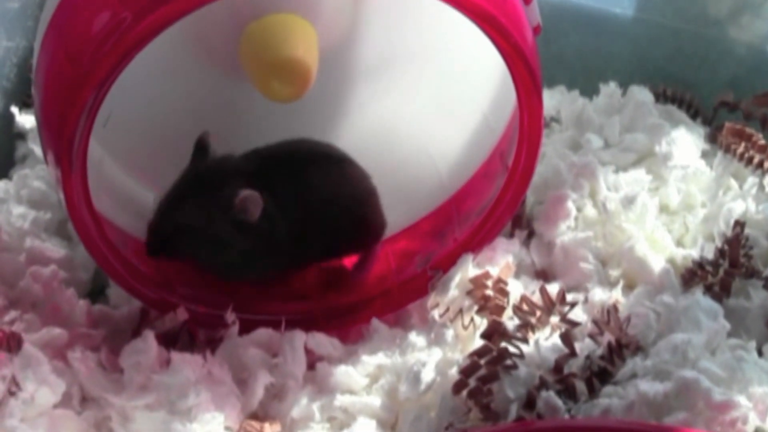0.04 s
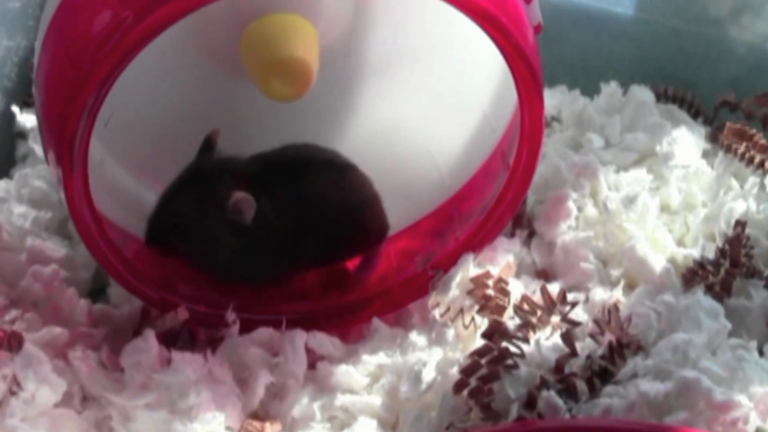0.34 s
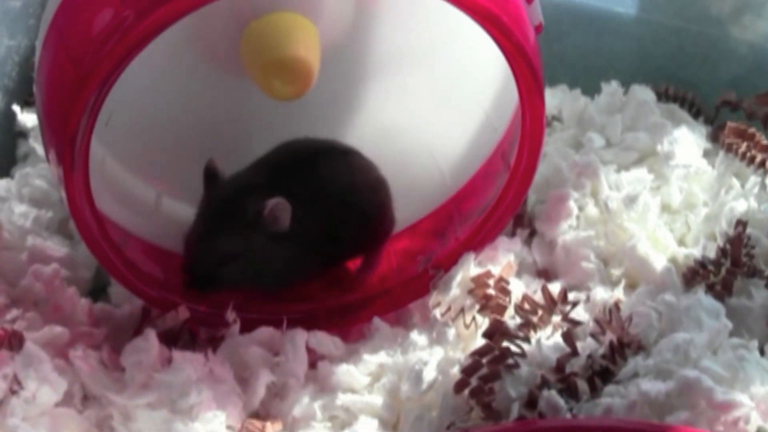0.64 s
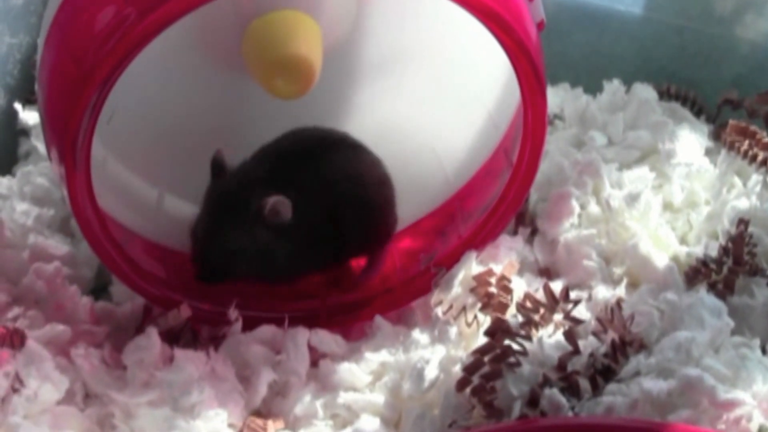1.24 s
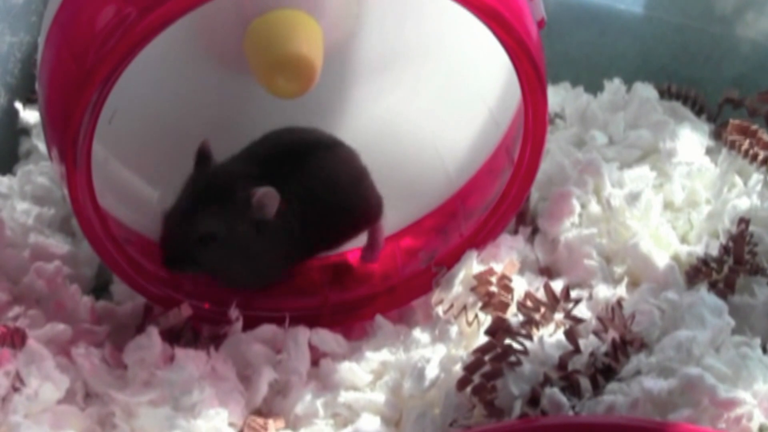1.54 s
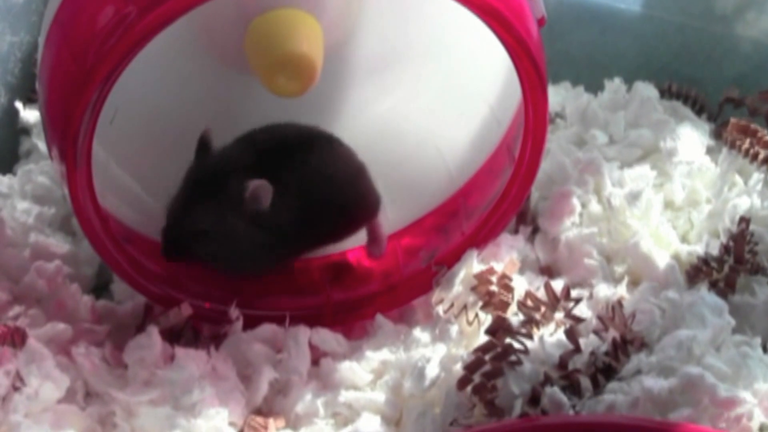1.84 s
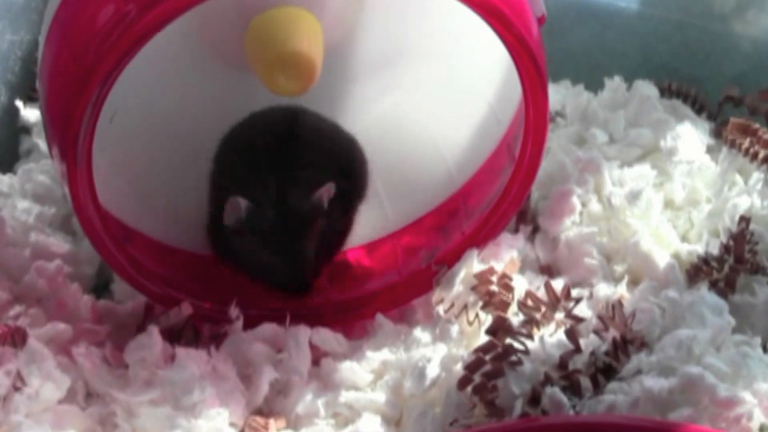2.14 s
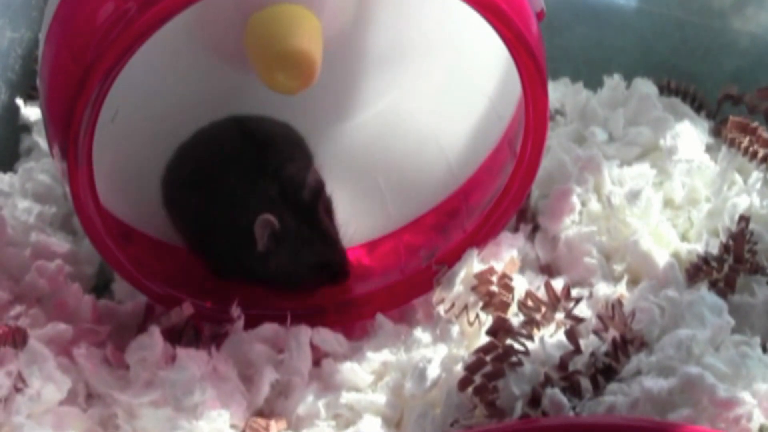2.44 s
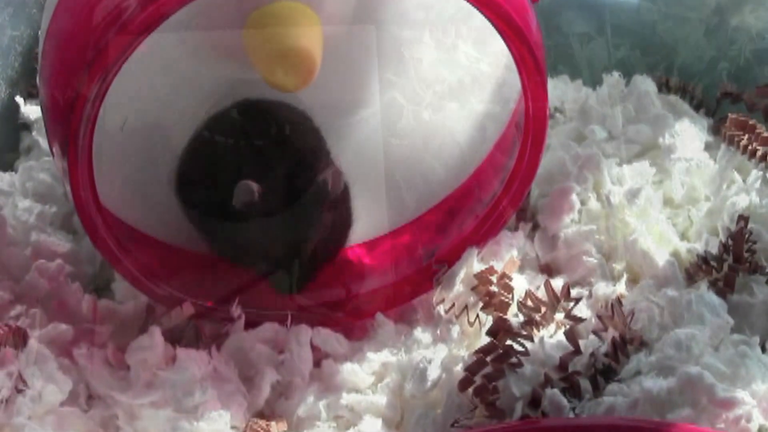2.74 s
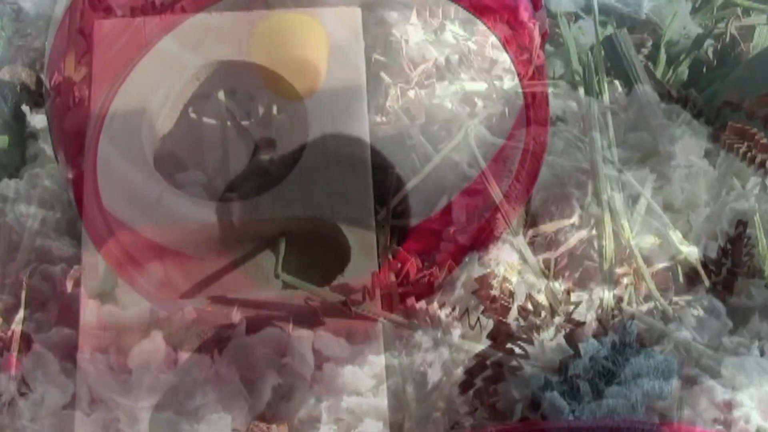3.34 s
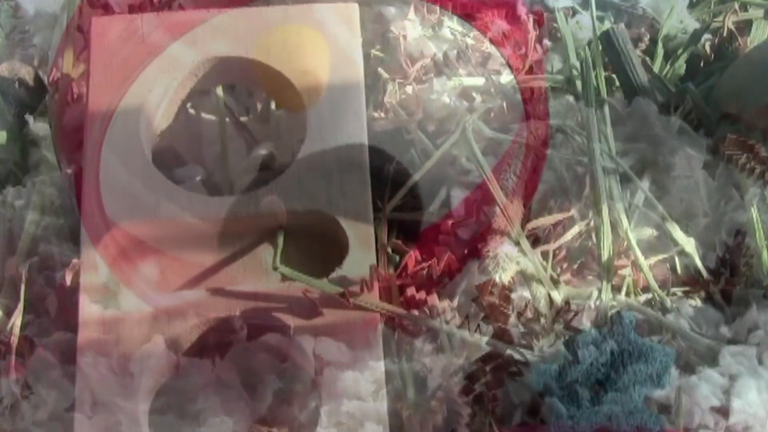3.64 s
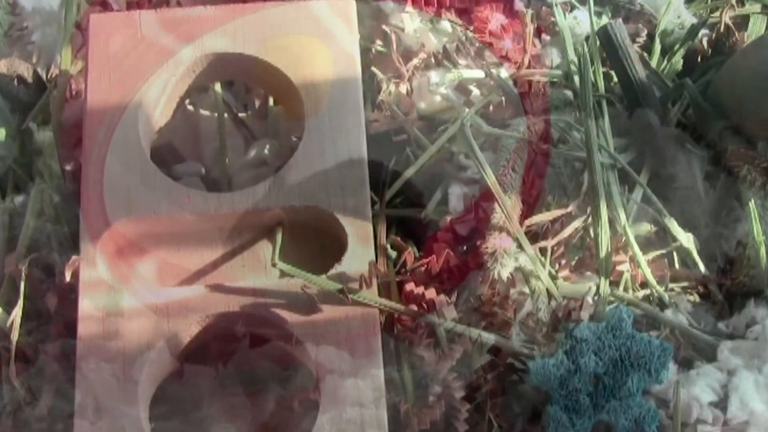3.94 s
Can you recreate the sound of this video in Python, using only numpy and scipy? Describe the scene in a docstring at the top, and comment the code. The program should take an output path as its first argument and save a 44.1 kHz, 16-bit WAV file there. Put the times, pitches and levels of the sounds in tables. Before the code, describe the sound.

Close, rapid scratching of hamster claws on a plastic wheel comes in uneven runs, with a faint rumble as the wheel rocks. After a lull, a few dry hay stalks snap softly. The quiet room hums and hisses throughout.

```python
"""A quiet room, close to a hamster scrabbling in its plastic wheel. Quick pairs of claw strokes rasp
over the plastic and set it ringing; a few catch and chirp. The wheel rumbles faintly as it rocks, and
an appliance hums. Around a brief dropout the room starts fading into a second, hissier one, where dry
hay crackles and a few stalks snap."""
import sys
import numpy as np
from scipy import signal
from scipy.fft import rfft, irfft
from scipy.io import wavfile
from scipy.ndimage import uniform_filter1d

SR = 44100
rng = np.random.default_rng(int(sys.argv[2]) if len(sys.argv) > 2 else 0)


def generate_wav(signal):
    """Clip the signal to [-1, 1] and save it as 16-bit WAV at the path in sys.argv[1]."""
    frames = np.transpose(np.atleast_2d(signal))
    scaled = np.clip(frames, -1, 1) * 32767
    pcm = np.round(scaled).astype(np.int16)
    wavfile.write(sys.argv[1], SR, pcm)


N = 176400
TIME = np.arange(N) / SR

# Claw strokes. Each row: start in seconds, relative level, bass and treble trims in dB, rise in seconds.
CLAW_STROKES = [(0.001, -52, 4.5, 0.5, 0.0022), (0.041, -52.5, -5, 1.5, 0.0026),
                (0.074, -47.5, -2, -3.5, 0.0068), (0.127, -55.5, -6, -7, 0.0047),
                (0.158, -45, -1, -3.5, 0.0036), (0.197, -47.5, 1.5, 2, 0.0028),
                (0.23, -43.5, 0.5, -2, 0.0031), (0.274, -45.5, -1, -0.5, 0.0031),
                (0.303, -44, -2.5, -1.5, 0.0027), (0.354, -49, 3, 1, 0.0032),
                (0.379, -49.5, 3.5, -2, 0.0037), (0.431, -44.5, 0.5, 3, 0.0023),
                (0.459, -47.5, 2, -2.5, 0.0026), (0.509, -44.5, 1, 0, 0.0023),
                (0.537, -50, 4.5, -2.5, 0.0033), (0.584, -38.5, -3.5, -2, 0.0025),
                (0.609, -46, -0.5, 0.5, 0.0028), (0.673, -49.5, -1, -0.5, 0.0059),
                (0.745, -46, -10, -5.5, 0.0048), (0.783, -49.5, -9, -1, 0.0043),
                (0.821, -54.5, 3, 3.5, 0.0047), (0.86, -58.5, -4, 3, 0.0039), (0.896, -57, 4, 1.5, 0.0065),
                (1.016, -52, -16, -1, 0.0039), (1.043, -63, 13.5, 10, 0.0057), (1.091, -44, 0.5, 1, 0.0028),
                (1.122, -41.5, 0, 0.5, 0.0033), (1.168, -44.5, 2, 0.5, 0.0028),
                (1.197, -43.5, 1, -1, 0.0032), (1.244, -40, -7, 0.5, 0.0025),
                (1.276, -45.5, -1, 1.5, 0.0038), (1.321, -55, -2.5, 0.5, 0.004),
                (1.349, -55, 2, 2.5, 0.004), (1.432, -47.5, -5, 4, 0.0034), (1.486, -51, -13, -3.5, 0.0047),
                (1.519, -56, -1, 4, 0.0053), (1.567, -60, -0.5, 4, 0.0051), (1.604, -52, -4, 0.5, 0.004),
                (1.643, -64, -3, 7.5, 0.0052), (1.681, -45.5, -4.5, -3, 0.0045), (1.727, -66, 1, 5, 0.008),
                (1.762, -51, 0, 0, 0.0043), (1.806, -50.5, -1.5, 5, 0.0039), (1.841, -51, 4, 4.5, 0.004),
                (1.892, -45.5, -2.5, 3, 0.0024), (1.923, -51, 4.5, -0.5, 0.0048),
                (1.974, -40.5, -8, -7.5, 0.0031), (2.003, -48, 0, 4, 0.0042),
                (2.051, -42.5, -4.5, -2, 0.0029), (2.08, -45.5, -1, 3.5, 0.0035),
                (2.122, -45, -4, -1, .002), (2.132, -54, -8, 7.5, 0.0027), (2.151, -44.5, -4.5, -5, 0.0017),
                (2.162, -52.5, -12, 6.5, 0.0022), (2.201, -56, -6, 2, 0.0054),
                (2.239, -44.5, 1.5, 1, 0.0024), (2.289, -49.5, -18, 3.5, 0.0022),
                (2.394, -74.5, 20.5, 3, 0.0029), (2.485, -64.5, 5.5, 1, 0.0051),
                (2.848, -60.5, 10.5, 8, 0.0018)]
# Paws shuffling between strokes. Each row: time in seconds, drive level in dB.
PAW_SHUFFLE = [(0, -55), (.98, -58), (1.45, -62), (2.15, -57.5), (2.33, -83), (4, -100)]
# The ring of the plastic. Each row: pitch in Hz, bandwidth in Hz, gain in dB.
WHEEL_MODES = [(1111.3, 16.1, 3), (1508, 10.5, -2), (1751, 30.4, 3.5), (1850, 12.6, 1), (2066, 35.6, 6.5),
               (2158, 15, 3), (2330, 19, -1), (2430, 21, -3.5), (2540, 12, -8), (2670, 17, -6),
               (2750, 22, -2), (3154, 14.5, 1.5), (3667, 14, -0.5), (3715, 35, -5), (3950, 68, -3),
               (4176, 41, -9.5), (4250, 54, -7), (4470, 67, -4), (4584, 55, -2.5), (4740, 50, -7.5),
               (4978, 83.5, 5.5), (5437, 48, -5), (6270, 76, -8), (6473, 55, -8.5), (6770, 72, -10.5),
               (7396, 190, -7.5), (7710, 190, -11), (8260, 110, -6), (8770, 280, -6), (9410, 98, -2.5),
               (10550, 72, -14)]
# EQ of the rasp straight off the claws. Each row: frequency in Hz, relative gain in dB.
RASP_EQ = [(300, -13), (900, 6), (1300, -56), (2000, -1), (4300, -4.5), (6000, -12.5), (9000, -10),
           (12000, -4), (15000, -32)]
# The rocking wheel. Each row: time in seconds, pitch in Hz, level in dB.
WHEEL_RUMBLE = [(0, 94.6, -75.5), (.28, 94.1, -57.5), (.6, 88.9, -59.5), (1.0, 86, -66.5),
                (2.4, 84.4, -69.5), (4, 84, -100)]
# EQ of each room tone. Each row: frequency in Hz, relative gain in dB.
FIRST_ROOM_EQ = [(25, -13), (110, -3), (200, -6.5), (330, -8), (500, -11.5), (1000, -15.5), (2000, -22.5),
                 (4000, -27), (14500, -43)]
SECOND_ROOM_EQ = [(25, -6), (120, -5.5), (220, -13), (500, -11.5), (1000, -20.5), (2000, -21),
                  (4500, -30.5), (9500, -36.5), (14500, -44)]
# Stereo image of the room tone. Each row: frequency in Hz, left-right correlation (1 is mono).
ROOM_CORRELATION = [(30, -0.069), (70, 0.95), (150, 0.83), (350, -0.033), (700, -0.26), (2400, 0.17),
                    (14000, 0.0099)]
# Catching claws. Each row: start in seconds, pitch in Hz, drive level in dB, log-pitch fall per second.
CLAW_CHIRPS = [(.041, 6630, -28, 16), (.078, 2380, -28.5, 2.93), (.357, 4800, -40, 33),
               (.616, 6610, -29, 18), (.784, 4304, -33, 35), (0.858, 5500, -45, 45), (.894, 6570, -31, 22),
               (1.015, 6450, -31, 22), (1.69, 4616, -39.5, 30), (2.208, 6720, -37, 65)]
# EQ of dry hay. Each row: frequency in Hz, relative gain in dB.
HAY_EQ = [(1000, -10), (3000, -2.5), (4000, 2.5), (6500, -1), (8700, 2), (11000, -7.5), (15000, -26)]
# The bed of rustling hay. Each row: time in seconds, level in dB.
HAY_RUSTLE = [(3.3, -88), (3.42, -72.5), (3.51, -80.5), (3.83, -76.5), (3.92, -69), (3.95, -78)]
# Snapping stalks. Each row: start in seconds, creak level in dB, creak pitch in Hz, crack level in dB.
HAY_SNAPS = [(3.389, -65, 2840, -74), (3.591, -45, 4650, -54.5), (3.665, -57, 8100, -54),
             (3.774, -52.5, 4350, -55.5), (3.873, -64, 5730, -80)]
# Small ticks in the hay. Each row: start in seconds, level in dB.
HAY_TICKS = [(3.334, -62), (3.549, -63), (3.954, -62.5)]


def from_db(db):
    """Decibels to gain."""
    return 10 ** (np.asarray(db) / 20)


def rms_one(x):
    """Scale to rms 1."""
    return x / np.sqrt(np.mean(x ** 2) + 1e-20)


def automation(rows):
    """A table's columns as curves over time."""
    times, *columns = np.transpose(rows)
    return [np.interp(TIME, times, column) for column in columns]


def per_bin(points):
    """A table over frequency, read at every FFT bin."""
    hz, value = np.transpose(points)
    return np.interp(np.log(np.arange(N // 2 + 1) * SR / N + 1), np.log(hz), value)


def equalise(x, eq):
    """Colour a sound with an EQ curve."""
    return irfft(rfft(x) * from_db(per_bin(eq)), N)


def butter(x, hz, kind, order=2):
    """Butterworth filter."""
    return signal.sosfilt(signal.butter(order, hz, kind, fs=SR, output="sos"), x + 1e-18)


def resonance(x, hz, width_hz):
    """Two-pole resonator with unity gain at its peak."""
    radius = np.exp(-np.pi * width_hz / SR)
    poles = [1, -2 * radius * np.cos(2 * np.pi * hz / SR), radius ** 2]
    return signal.lfilter(np.array([1, 0, -1]) * (1 - radius ** 2) / 2, poles, x + 1e-18)


def drift(hz):
    """Smooth random modulation, mostly slower than hz; rms 1."""
    rolloff = 1 + (np.arange(N // 2 + 1) * SR / N / hz) ** 2
    return rms_one(irfft(rfft(rng.standard_normal(N)) / rolloff, N))


def grains(per_s, spread_db):
    """Random clicks of uneven size; rms 1."""
    sizes = from_db(spread_db * np.minimum(rng.exponential(1, N), 3)) * rng.choice([-1, 1], N)
    return rms_one(sizes * (rng.random(N) < per_s / SR))


def push(start, rise_s):
    """Contact envelope: begins early, swells to 1 just after start + rise_s and lets go."""
    lead_s, lag_s = 0.88 * rise_s, 0.0017
    force, first = np.zeros(N), max(int((start - lead_s) * SR), 0)
    age = np.arange(min(SR // 10, N - first)) / SR / max(rise_s + lead_s + lag_s, 1e-4)
    force[first:first + len(age)] = (age * np.exp(1 - age)) ** 2.61
    return force


def claws():
    """Each stroke is a short run of tiny slips, duller or brighter with the angle of the claw."""
    treble_lead_s, bass_lag_s = 0.00053, 0.00082  # the claw slows as it digs in: treble first, bass last
    bass_hz, treble_hz, drag_s = 3060, 6480, 0.024
    force = np.zeros((3, N))  # bass, mid, treble
    for start, db, bass_db, treble_db, rise_s in CLAW_STROKES:
        gain = from_db(db + 15.5)
        graze = from_db(-12.5) * push(start - 0.0045, rise_s / 2)  # the tip brushes the plastic first
        force[0] += gain * from_db(bass_db - 1.5) * push(start + bass_lag_s, rise_s)
        force[1] += gain * push(start, rise_s)
        force[2] += gain * from_db(treble_db - 3.5) * (graze + push(start, rise_s - treble_lead_s))
    decay = np.exp(-1 / (drag_s * SR))
    force += from_db(-25) * signal.lfilter([1 - decay], [1, -decay], force)  # the claw trails on
    slips = grains(per_s=8000, spread_db=2.5)
    bands = [butter(slips, bass_hz, "low", order=4),
             butter(slips, [bass_hz, treble_hz], "band", order=3),
             butter(slips, treble_hz, "high", order=4)]
    return np.sum(force * bands, axis=0)


def paws():
    """Shuffling paws lay a soft, grainy bed under the strokes."""
    db, = automation(PAW_SHUFFLE)
    return from_db(db + drift(hz=38)) * grains(per_s=3600, spread_db=2.8)


def wheel(force):
    """The plastic rings under the direct rasp; claws landing in new places favour other modes."""
    low_hz, high_hz = 960, 9930  # the band a claw tip can drive
    force = butter(butter(force, low_hz, "high", order=3), high_hz, "low")
    ring = sum(resonance(force * from_db(db + 2.5 * drift(hz=14)), hz, width_hz)
               for hz, width_hz, db in WHEEL_MODES)
    return ring + from_db(-14) * equalise(force, RASP_EQ)


def reflections(x, t60_s):
    """A dense, dying reverb tail, different at each ear."""
    t = TIME[:SR // 2]
    tail = rng.standard_normal((2, len(t))) * from_db(-60 * t / t60_s) * (t > 0.001)
    tail /= np.sqrt(np.sum(tail ** 2, axis=1, keepdims=True))
    return signal.fftconvolve(x[None], tail, axes=1)[:, :N]


def rumble():
    """The wheel's low, unsteady note as it rocks on its stand."""
    hz, db = automation(WHEEL_RUMBLE)
    gain = from_db(db + 5 * drift(hz=0.9))
    pitch = hz + 4.6 * drift(hz=15.6)
    return gain * np.sqrt(2) * np.sin(2 * np.pi * np.cumsum(pitch) / SR)


def room_tone(eq, db):
    """Steady air, nearly mono in the bass and wide above."""
    mid, side = rfft(rng.standard_normal((2, N)))
    alike = np.clip(per_bin(ROOM_CORRELATION), -1, 1)
    stereo = irfft(np.sqrt(1 + alike) * mid + np.sqrt(1 - alike) * side * [[1], [-1]], N)
    return from_db(db) * rms_one(equalise(stereo, eq))


def hum(hz, db, left_phase=0):
    """A gently wavering appliance tone; left_phase, in radians, widens it."""
    gain = from_db(db + 1.1 * drift(hz=0.57))
    phase = 2 * np.pi * hz * TIME + 0.3 * drift(hz=2.4)
    return gain * np.sqrt(2) * np.sin(phase + np.array([[left_phase], [0]]))


def stick_slip(start, hz, fall_per_s, jitter):
    """A chattering tone that slides down through hz for 20 ms as the contact slows."""
    pitch = hz * jitter * np.exp(-fall_per_s * np.clip(TIME - start - 0.0045, -0.01, 0.01))
    return np.sin(2 * np.pi * np.cumsum(pitch) / SR)


def chirps():
    """A claw catches and squeaks in nearly regular stick-slip."""
    jitter = 1 + 0.05 * drift(hz=1054)
    return sum(from_db(db) * push(start, rise_s=0.0019) * stick_slip(start, hz, fall, jitter)
               for start, hz, db, fall in CLAW_CHIRPS)


def hay():
    """Stalks give way with a soft crack and a falling creak, then ring briefly, over ticks and rustle."""
    fibres = grains(per_s=7300, spread_db=1.7)
    jitter = 1 + 0.14 * drift(hz=998)
    crack = rms_one(equalise(fibres, HAY_EQ))
    crackle = rms_one(equalise(grains(per_s=1200, spread_db=4), HAY_EQ))
    rustle = from_db(automation(HAY_RUSTLE)[0]) * crackle
    ticks = crack * sum(from_db(db) * push(start, rise_s=0.00063) for start, db in HAY_TICKS)
    snaps, tail_s = np.zeros(N), 0.0079
    for start, creak_db, hz, crack_db in HAY_SNAPS:
        ring_hz, width_hz = 0.94 * hz, 0.22 * hz  # the stalk rings a little below its creak
        ring = rms_one(resonance(resonance(fibres, ring_hz, width_hz), ring_hz, width_hz))
        creak = np.sqrt(2) * stick_slip(start, hz, fall_per_s=9.6, jitter=jitter)
        bend = push(start, rise_s=0.003)
        tail = from_db(-14) * push(start + tail_s / 2, tail_s)
        snaps += from_db(creak_db) * ((creak + ring) / np.sqrt(2) * bend + ring * tail)
        snaps += from_db(crack_db) * crack * (bend + tail)
    return rustle + ticks + snaps


def scene():
    """The wheel in its cage and room, crossfading toward the room with the hay."""
    fade_start_s, fade_end_s = 2.57, 4.52  # still fading when the sound ends
    mains_hz, air_db = 118.7, -56.5
    close = wheel(claws() + chirps() + paws()) + hay()
    cage = from_db(-2) * reflections(butter(close, 10200, "high"), t60_s=0.0047)
    walls = from_db(-12) * reflections(close, t60_s=0.14)
    first_room = room_tone(FIRST_ROOM_EQ, air_db)
    first_room += hum(hz=281.5, db=-62, left_phase=0.4) + hum(mains_hz, db=-69.5)
    second_room = room_tone(SECOND_ROOM_EQ, air_db) + hum(mains_hz, db=-62.5)
    fade = np.clip((TIME - fade_start_s) / (fade_end_s - fade_start_s), 0, 1)
    return close + cage + walls + rumble() + (1 - fade) * first_room + fade * second_room


def record(dry):
    """The mix drops out for an instant, and a steep low-pass trims the top."""
    drop_start_s, drop_end_s, cutoff_hz = 2.648, 2.674, 15300
    gate = uniform_filter1d(1.0 * ((TIME < drop_start_s) | (TIME > drop_end_s)), size=40)
    low_pass = signal.ellip(10, 0.1, 80, cutoff_hz, fs=SR, output="sos")
    return signal.sosfilt(low_pass, dry * np.maximum(gate, 0.01))


dry = scene()
out = record(dry)
generate_wav(out)
```